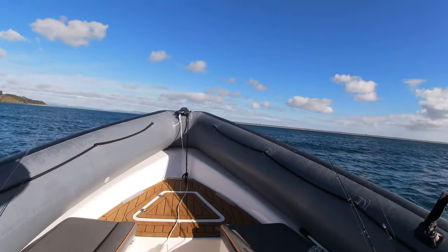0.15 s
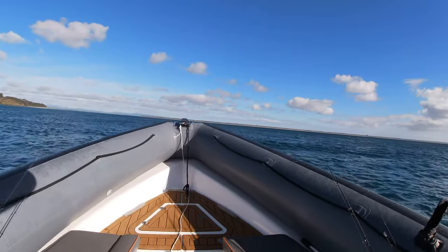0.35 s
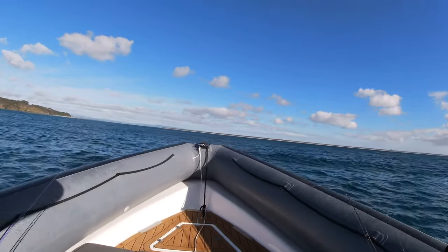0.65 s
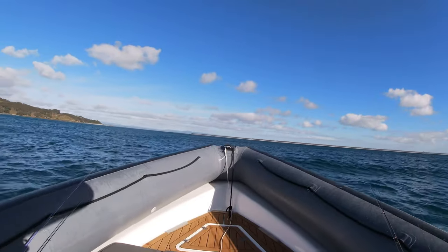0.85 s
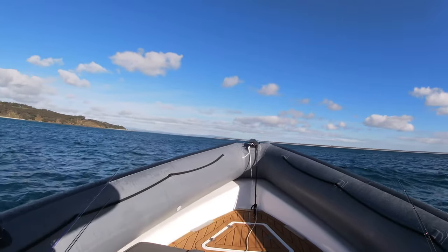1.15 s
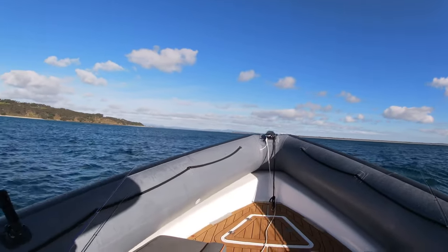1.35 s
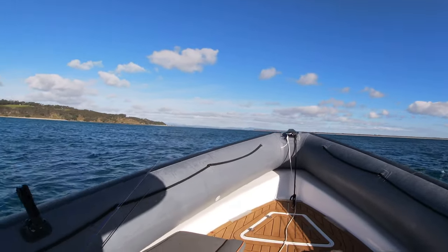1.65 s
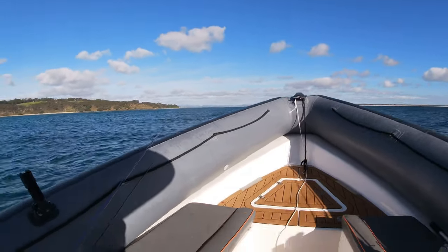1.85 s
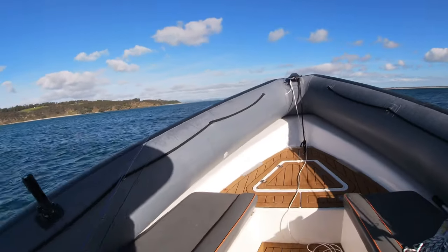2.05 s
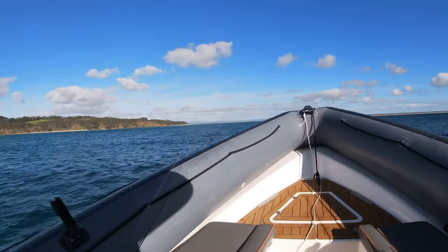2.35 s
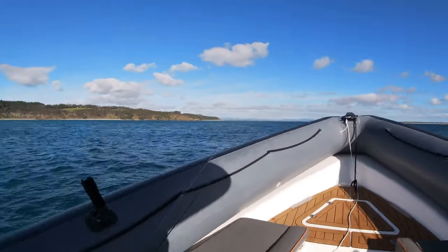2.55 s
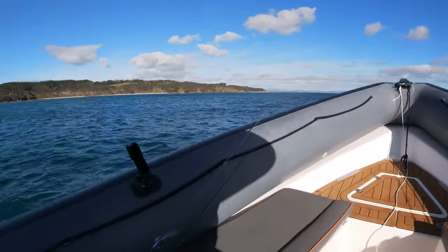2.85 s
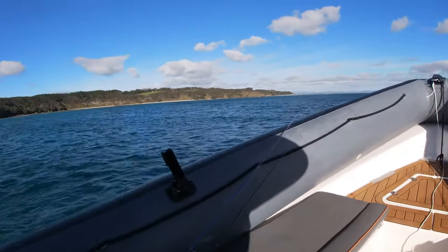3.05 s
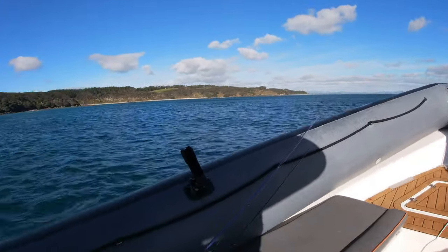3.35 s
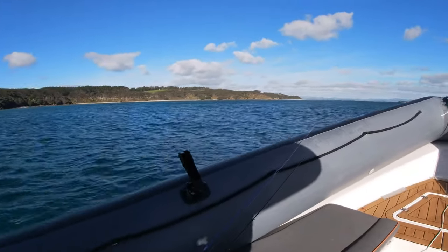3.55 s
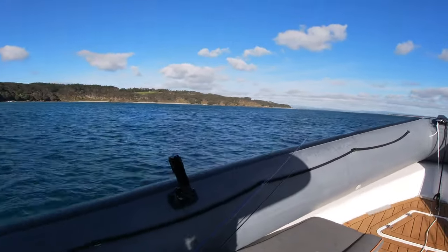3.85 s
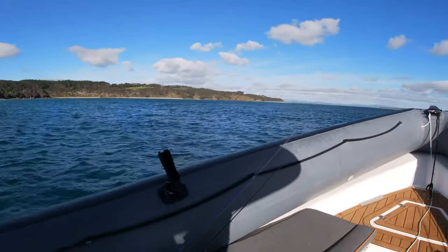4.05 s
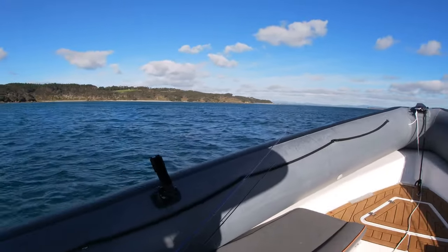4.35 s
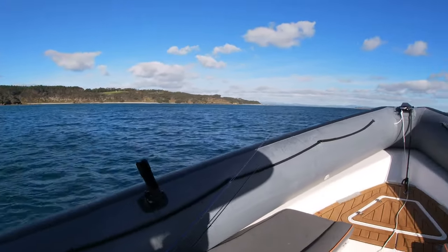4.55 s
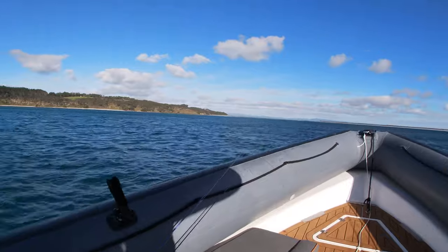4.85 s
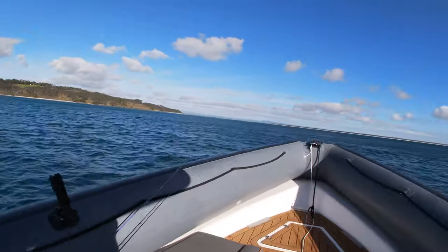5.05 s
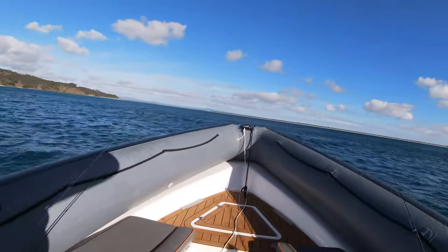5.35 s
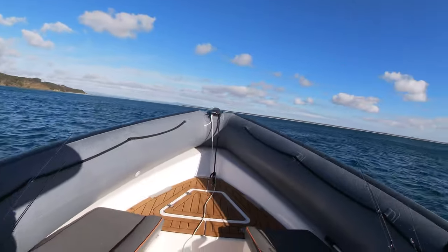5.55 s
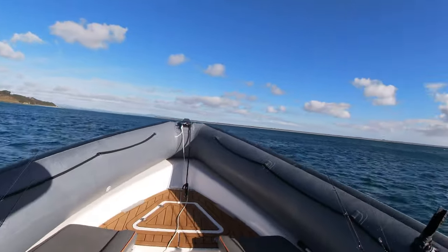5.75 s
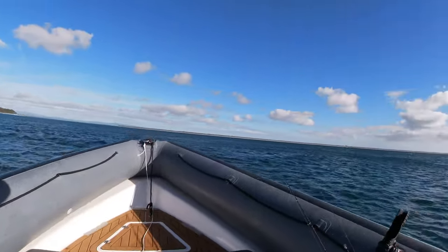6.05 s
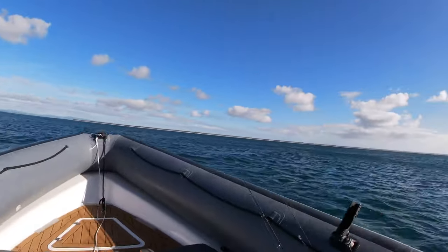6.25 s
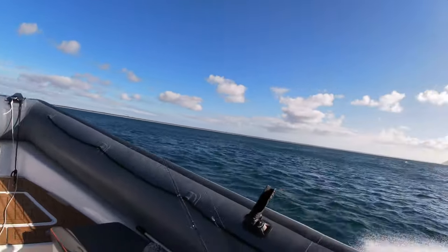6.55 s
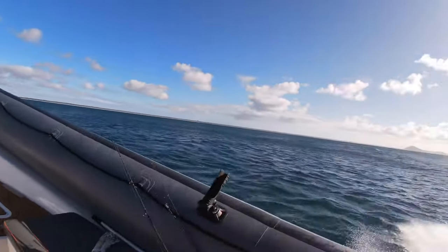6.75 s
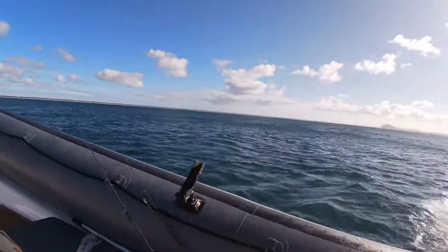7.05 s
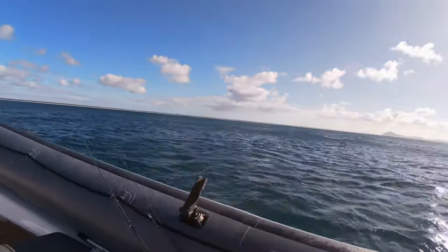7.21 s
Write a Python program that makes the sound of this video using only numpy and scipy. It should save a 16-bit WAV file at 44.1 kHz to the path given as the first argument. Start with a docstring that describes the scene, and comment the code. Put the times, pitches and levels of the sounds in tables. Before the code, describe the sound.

Harsh wind gusts thump, tear and crackle on a small microphone aboard a fast inflatable boat, over rushing water, spray hiss and outboard drone.

```python
"""An inflatable speedboat runs over choppy sea, heard through a small microphone port in the airstream.
Two beating sines drone and a gear whine sings, loud at first; they sink before 1 s and return higher after 5 s.
Throughout, shaped noise makes hull water, bow foam, deep airflow rumble, and a hiss each time the bow drops.
Lesser random gusts run throughout; from 0.3 s larger ones thump, tear and crackle; spikes crack from 0.5 s.
Bright noise bursts come from 3.6 s; pitched noise bands swish near 5.0, 6.4 and 7.2 s."""
import sys
import numpy as np
from scipy import signal
from scipy.fft import rfft, irfft
from scipy.io import wavfile
from scipy.ndimage import uniform_filter1d

SR = 44100
rng = np.random.default_rng(int(sys.argv[2]) if len(sys.argv) > 2 else 0)


def materialize(psi):
    """Save the field psi as 16-bit PCM at rate SR to the path in sys.argv[1].

    A 1-D psi becomes a single channel; in a 2-D psi each row is a channel.
    """
    bounded = np.clip(np.atleast_2d(psi).T, -1, 1)
    quanta = np.round(bounded * 32767).astype(np.int16)
    wavfile.write(sys.argv[1], SR, quanta)


N = 325458
TIME = np.arange(N) / SR
# Spectra are relative; each sound is scaled after filtering. Level tables are before any *_gain_db.


def from_db(db):
    """Decibels to amplitude gain."""
    return 10 ** (np.asarray(db) / 20)


def rms_one(x):
    """Scale to unit power."""
    return x / np.sqrt(np.mean(x ** 2) + 1e-20)


def in_time(rows):
    """Interpolate each table column over TIME; the first column is time."""
    s, *columns = np.transpose(rows)
    return [np.interp(TIME, s, column) for column in columns]


def swells(rows):
    """Sum of Gaussian bells in dB, one per row."""
    coarse_s = TIME[::40]
    total_db = sum(level_db * np.exp(-((coarse_s - middle_s) / half_width_s) ** 2)
                   for middle_s, half_width_s, level_db in rows)
    return np.interp(TIME, coarse_s, total_db)


def noise():
    """White noise."""
    return rng.standard_normal(N)


def drift(rate_hz):
    """Unit-power random curve, low-passed near rate_hz."""
    hz = np.arange(N // 2 + 1) * SR / N
    return rms_one(irfft(rfft(noise()) / (1 + (hz / rate_hz) ** 4), N))


def flutter(rate_hz, depth_db):
    """Unit-power random gain, extremes rounded by tanh."""
    return rms_one(from_db(depth_db * 2 * np.tanh(drift(rate_hz) / 2)))


def filtered(x, spectrum):
    """Shape the spectrum with a gain that leaves the power of white noise unchanged."""
    spectrum_hz, spectrum_db = np.transpose(spectrum)
    bins_hz = np.arange(1, N // 2 + 2) * SR / N
    gain_db = np.interp(np.log(bins_hz), np.log(spectrum_hz), spectrum_db)
    return irfft(rfft(x) * rms_one(from_db(gain_db)), N)


def colour(x, spectrum):
    """Shape the spectrum; unit power."""
    return rms_one(filtered(x, spectrum))


def even(x, span_s):
    """Level the power over spans longer than span_s."""
    size = max(int(span_s * SR), 8)
    power = uniform_filter1d(uniform_filter1d(x ** 2, size), size)
    return x / np.sqrt(power + 1e-9)


def tone(hz):
    """Unit-power sine that follows a pitch curve."""
    return np.sqrt(2) * np.sin(2 * np.pi * np.cumsum(hz) / SR)


# short level dips: middle_s, half_width_s, depth_db (negative = rise)
DIPS = [(0.08, 0.045, 5.5), (0.281, 0.028, 3.5), (0.64, 0.017, 1), (1.025, 0.03, 3), (1.21, 0.048, 6),
        (1.357, 0.014, 5), (1.415, 0.011, 9), (1.49, 0.027, 4.5), (1.66, 0.019, 11), (1.992, 0.015, 9),
        (2.155, .018, 5.5), (2.32, 0.011, 19), (2.661, 0.01, 9), (2.733, .014, -2.5), (3.055, 0.062, 4),
        (3.262, 0.019, 2), (3.419, 0.015, 13), (3.492, 0.014, 6), (3.643, 0.032, 6), (4.026, 0.0089, 7),
        (4.122, 0.025, -0.5), (4.232, 0.02, 5), (4.391, 0.025, 8.5), (4.637, 0.016, 13),
        (4.896, 0.0075, 10), (5.114, .016, 2.5), (5.215, 0.02, 3), (5.668, .014, 4), (5.723, 0.019, 3.5),
        (7.145, 0.019, 4.5), (7.238, 0.008, 10), (7.317, 0.0091, 16)]


def dip_gain():
    """Amplitude gain that dips briefly, often beside loud hits."""
    return from_db(-swells(DIPS))


# outboards: time_s, whine_hz, whine_db, drone_db
ENGINE = [(0, 427, -37.5, -18.5), (.4, 433, -33.5, -17), (.7, 435, -31.5, -21.5), (.95, 422, -37, -36.5),
          (3.3, 416, -50.5, -35.5), (5.2, 470, -44, -35), (5.65, 480, -37.5, -26), (6.2, 481, -38, -26),
          (6.85, 479, -40, -28.5), (7.38, 470, -44, -28)]
WHINE_PER_DRONE = 3.7   # gear whine pitch / exhaust pitch


def outboards(drone_waver_hz, twin_hz_above, twin_db):
    """Two close exhaust sines beat into a throb; a thin gear whine follows the same engine speed."""
    whine_hz, whine_db, drone_db = in_time(ENGINE)
    drone_hz = whine_hz / WHINE_PER_DRONE
    first = tone(drone_hz + drone_waver_hz * drift(20))
    twin = tone(drone_hz + twin_hz_above + drone_waver_hz * drift(20)) * from_db(twin_db)
    drone = (first + twin) * flutter(rate_hz=30, depth_db=1.4)
    whine = tone(whine_hz + 4.5 * drift(25)) * flutter(rate_hz=22, depth_db=2.8)   # 4.5 Hz waver
    return drone * from_db(drone_db) + whine * from_db(whine_db)


# water along the hull: time_s, level_db
RUSH = [(0.0, -49), (0.45, -38), (1.27, -42.5), (1.91, -37), (4.8, -39), (5.9, -40.5), (6.45, -36),
        (6.8, -44), (7.38, -39.5)]
# water spectrum: freq_hz, density_db_per_hz
WATER = [(150, -5), (400, 9.5), (600, 1.5), (900, 0.5), (1350, -2.5), (2000, -12.5), (3000, -19.5),
         (4300, -38), (6000, -39.5), (9000, -59)]


def hull_water(gain_db):
    """Turbulent water rushing along the hull: fluttering noise."""
    level_db, = in_time(RUSH)
    return colour(noise(), WATER) * flutter(rate_hz=49, depth_db=1.0) * from_db(level_db + gain_db)


# foam beside the tube: time_s, level_db
BOW_WAVE = [(0.0, -50.5), (0.78, -51), (1.35, -54), (1.62, -60), (1.79, -44.5), (1.93, -46.5), (2.63, -52),
            (3.33, -54.5), (3.95, -50.5), (4.27, -54.5), (4.77, -53.5), (5.55, -45.5), (5.75, -51),
            (6.04, -50.5), (6.47, -43), (6.68, -46.5), (7.38, -50)]
# foam spectrum: freq_hz, density_db_per_hz
FOAM = [(1000, -16), (2000, 1), (2900, 1), (4200, -4), (5200, -12), (7000, -39.5)]


def bow_foam(gain_db):
    """Bow-wave foam: finely grained noise under a slower flutter."""
    level_db, = in_time(BOW_WAVE)
    grains = colour(noise() * flutter(rate_hz=430, depth_db=2.0), FOAM)
    return grains * flutter(rate_hz=35, depth_db=0.8) * from_db(level_db + gain_db)


# spray sheets, one per bow drop: start_s, hold_s, level_db
SPRAY = [(0.0, 0.025, -56.5), (0.896, 0.23, -59.5), (1.85, 0.049, -54.5), (2.069, 0.11, -51),
         (2.817, 0.14, -56.5), (3.596, 0.34, -61.5), (4.14, .05, -57), (4.892, 0.053, -63.5),
         (5.479, 0.19, -49), (6.49, 0.16, -53.5)]
SPRAY_RISE_DB_PER_S, SPRAY_FALL_DB_PER_S, MIST_DB = 57.5, 43, -68.5


def spray_strength():
    """Each sheet swells up to its start, holds and rains out; powers add over a constant mist."""
    power = from_db(MIST_DB) ** 2
    for start_s, hold_s, level_db in SPRAY:
        t = TIME - start_s
        rise_db = SPRAY_RISE_DB_PER_S * np.maximum(-t, 0)
        fall_db = SPRAY_FALL_DB_PER_S * np.maximum(t - hold_s, 0)
        power = power + from_db(level_db - rise_db - fall_db) ** 2
    return np.sqrt(power)


# hiss spectrum: freq_hz, density_db_per_hz
HISS = [(900, -4), (2000, 3.5), (3200, 1.5), (4600, 4), (5400, 7.5), (5950, 4.5), (6500, -4.5), (7100, -8),
        (8500, -13.5), (10300, -26.5), (11200, -35), (13000, -42.5)]
# bright hiss spectrum: freq_hz, density_db_per_hz
BRIGHT_HISS = [(3000, -24.5), (5000, -2), (5900, 7.5), (6700, -4), (8500, -10), (10300, -15), (11200, -21),
               (13000, -34.5)]


def spray(hiss_gain_db, bright_gain_db, bright_growth):
    """Spray hiss with a brighter top layer, stronger where the hiss is louder."""
    sheets = spray_strength()
    hiss = colour(noise() * flutter(rate_hz=600, depth_db=1.5), HISS) * from_db(hiss_gain_db)
    bright = colour(noise() * flutter(rate_hz=1300, depth_db=4.5), BRIGHT_HISS)
    bright = bright * (sheets / sheets.max()) ** bright_growth * from_db(bright_gain_db)
    return (hiss + bright) * sheets * flutter(rate_hz=25, depth_db=0.6)


# steady airflow, also sets the puffs: time_s, level_db
FLOW = [(0.0, -30), (0.659, -27), (1.17, -27), (2.36, -27), (2.769, -31), (3.021, -23), (4.4, -27),
        (4.851, -22.5), (5.71, -29.5), (6.56, -25.5), (6.66, -26), (6.93, -28.5), (7.09, -22), (7.38, -28)]
# slow eddies heaving at the port: middle_s, half_width_s, boost_db
BUFFETS = [(0.785, 0.036, 4.5), (0.84, 0.012, 3), (0.87, 0.018, 4.5), (0.917, 0.0098, 4.5),
           (0.98, .014, 2.5), (1.09, 0.02, 6), (1.389, 0.018, 9), (1.578, 0.01, 10.5), (1.882, 0.014, 4),
           (2.298, .014, 5), (2.364, 0.013, 3), (2.63, 0.019, 5), (2.815, 0.025, 7.5), (3.465, 0.014, 7),
           (3.814, 0.038, 2.5), (4.078, 0.013, 5.5), (4.192, 0.011, 4), (4.428, 0.017, 4), (4.821, .018, 3),
           (5.148, 0.015, 6.5), (5.484, 0.013, 4), (6.078, 0.015, 9), (6.19, 0.029, 4), (7.222, .01, 5)]
# rumble spectrum: freq_hz, density_db_per_hz
RUMBLE = [(8, -12.5), (20, 0), (35, 1), (60, 2.5), (85, -1.5), (115, -1.5), (150, -12), (250, -35.5),
          (600, -95)]
# small-eddy spectrum: freq_hz, density_db_per_hz
AIRFLOW = [(60, -18), (130, 1.5), (200, 2), (300, -5.5), (420, -5), (600, -17), (1200, -40), (4000, -85)]
# tearing spectrum, rustle and gusts: freq_hz, density_db_per_hz
TEAR = [(150, -11.5), (350, -9), (520, 6.5), (750, 2.5), (1100, -3.5), (1500, -9.5), (2100, -25),
        (3000, -35.5), (5000, -56), (9000, -88.5)]
RUMBLE_DB, RUMBLE_FOLLOWS = -17.5, 0.41   # at mean airflow; share of the airflow's dB swing


def airstream(airflow_gain_db, rustle_db, dip, flow_follows):
    """Large eddies rumble and lurch with buffets, small ones flow and rustle; all follow the dips."""
    airflow_db, = in_time(FLOW)
    rumble_db = RUMBLE_DB + RUMBLE_FOLLOWS * (airflow_db - airflow_db.mean()) + swells(BUFFETS)
    eddies = flutter(rate_hz=42, depth_db=2.5)
    lumps = rms_one(eddies ** 0.39) * flutter(rate_hz=14, depth_db=1.5)
    rumble = even(colour(noise(), RUMBLE), 0.031) * lumps * from_db(rumble_db)
    flow = even(colour(noise(), AIRFLOW), 0.02) * eddies * from_db(airflow_gain_db)
    rustle = colour(noise(), TEAR) * rms_one(eddies ** 2) * from_db(rustle_db)
    small_eddies = (flow * dip ** flow_follows + rustle * dip) * from_db(airflow_db)
    return rumble * dip + small_eddies


# short bright noise bursts on hard wind hits: middle_s, decay_s, level_db
BRIGHT_BURSTS = [(3.565, 0.0087, -42), (4.003, 0.0056, -45.5), (6.384, 0.0053, -44), (6.487, 0.0053, -34)]
# burst spectrum: freq_hz, density_db_per_hz
BURST = [(1500, -19), (3000, 5), (4200, -0.5), (5800, -5), (7000, -21), (10000, -36), (13000, -56)]


def bright_bursts(gain_db):
    """Bright bursts of noise, rising and decaying exponentially."""
    strength = sum(from_db(level_db) * np.exp(-np.minimum(np.abs(TIME - middle_s) / decay_s, 20))
                   for middle_s, decay_s, level_db in BRIGHT_BURSTS)
    bright = even(colour(noise() * flutter(rate_hz=900, depth_db=0.5), BURST), 0.004)
    return bright * strength * from_db(gain_db)


# swishes at the housing edge: start_s, length_s, first_hz, last_hz, width_per_pitch, peak_db
SWISHES = [(5.034, .024, 894, 730, 0.191, -22.5), (6.346, 0.033, 458, 750, 0.1, -24),
           (6.375, 0.052, 485, 366, 0.057, -24), (6.366, 0.11, 1280, 947, .08, -39),
           (6.442, 0.047, 484, 690, 0.18, -27), (6.45, .1, 2010, 1664, .12, -41),
           (6.476, 0.13, 556, 289, 0.045, -38), (6.496, 0.039, 1140, 1260, 0.082, -39),
           (6.572, .048, 634, 397, 0.124, -26), (6.607, 0.057, 806, 674, 0.2, -25),
           (7.209, 0.055, 1724, 1390, 0.26, -38)]


def swishes():
    """Eddies shed from an edge make a noise band whose pitch glides with the air speed."""
    out = np.zeros(N)
    shedding_hz = 100
    shedding = drift(shedding_hz) + 1j * drift(shedding_hz)
    for start_s, length_s, first_hz, last_hz, width_per_pitch, peak_db in SWISHES:
        near = slice(int(start_s * SR), int((start_s + length_s) * SR))
        progress = np.linspace(0, 1, len(TIME[near]))
        phase = 2 * np.pi * np.cumsum(first_hz * (last_hz / first_hz) ** progress) / SR
        read_speed = width_per_pitch * first_hz / shedding_hz   # faster reading widens the band
        wobble = np.interp(start_s / 2 + progress * length_s * read_speed, TIME, shedding)
        band = rms_one((wobble * np.exp(1j * phase)).real)
        arch = 2 * np.sqrt(progress * (1 - progress))
        out[near] += band * arch * from_db(peak_db)
    return out


# cracks where flow breaks off the port: start_s, tail_s, level_db
CRACKS = [(0.468, 0.0039, -25.5), (0.584, 0.004, -27), (0.974, 0.0055, -24), (1.571, 0.0018, -24),
          (1.602, 0.0062, -21), (1.6185, 0.0028, -22.5), (1.6945, 0.0055, -24), (1.866, .008, -22.5),
          (2.05, .002, -23), (2.439, 0.0043, -17), (2.478, 0.0045, -26.5), (2.534, 0.0074, -19),
          (2.805, 0.0015, -16), (2.857, 0.0044, -21.5), (2.877, .001, -27.5), (3.091, 0.0026, -20),
          (3.452, 0.013, -16.5), (3.555, 0.017, -17.5), (3.58, .001, -17), (4.0056, 0.0019, -21.5),
          (4.01, 0.0044, -18.5), (4.047, 0.0018, -13.5), (4.073, 0.0016, -10), (4.334, 0.0024, -20.5),
          (4.708, 0.0033, -21.5), (4.855, 0.0026, -19.5), (4.906, 0.0024, -25.5), (5.033, 0.0023, -18),
          (5.415, 0.0051, -22), (5.5904, 0.0028, -30), (6.381, .005, -19.5), (6.393, 0.0024, -18.5),
          (6.47, 0.0038, -23), (6.4825, 0.0052, -18), (6.619, .003, -22.5), (6.6263, .004, -22),
          (6.984, .003, -24.5), (7.086, 0.0028, -27), (7.174, 0.023, -13.5), (7.207, 0.0034, -16.5),
          (7.275, 0.003, -22.5), (7.299, 0.0039, -27.5), (7.361, 0.0018, -14.5)]
# crack spectrum: freq_hz, density_db_per_hz
SNAP = [(100, 8.5), (400, 4), (900, 7), (1600, 1), (3000, -12), (4300, -23), (6000, -30), (7200, -48),
        (10000, -70.5)]


def cracks(spike_s, gain_db):
    """Each crack is a pressure spike with the energy of spike_s of noise, plus a short ragged tail."""
    spikes, tails = np.zeros(N), np.zeros(N)
    for start_s, tail_s, level_db in CRACKS:
        first = int(start_s * SR)
        t = TIME[:N - first][:SR // 10]
        spikes[first] = from_db(level_db) * np.sqrt(spike_s * SR)
        tails[first:first + len(t)] += from_db(level_db) * np.exp(-(t / tail_s) ** 2)
    ragged = even(colour(noise() * flutter(rate_hz=2700, depth_db=7.0), SNAP), 0.0068)
    tail = ragged * uniform_filter1d(tails, size=32)
    return (filtered(spikes, SNAP) + tail) * from_db(gain_db)


PUFFS_PER_S, PUFF_S = 13, 0.005   # PUFF_S: middle length, varied from half to double
PUFF_THUMP_DB, PUFF_TEAR_DB, PUFF_SPREAD_DB = -1, -8, 4.5   # relative to the airflow


def puffs():
    """Random lesser gusts that follow the airflow level; rows as in GUSTS."""
    flow_s, flow_db = np.transpose(FLOW)
    rows = []
    for k, (when, size, force) in enumerate(rng.uniform(-1, 1, (120, 3))):
        start_s = (k + .5 + when / 2) / PUFFS_PER_S
        level_db = np.interp(start_s, flow_s, flow_db) + PUFF_SPREAD_DB * force
        rows.append((start_s, PUFF_S * 2 ** size, level_db + PUFF_THUMP_DB, level_db + PUFF_TEAR_DB))
    return [row for row in rows if row[0] < TIME[-1]]


# gusts hitting the port: start_s, length_s, thump_db, tear_db
GUSTS = [(0.326, 0.037, -23, -34), (0.464, 0.01, -12.5, -26.5), (0.497, .008, -22, -29),
         (0.548, 0.013, -15, -26.5), (0.583, 0.0098, -17, -28.5), (0.83, 0.021, -18, -28.5),
         (0.857, 0.0065, -17, -28), (0.907, 0.014, -12, -26), (0.969, 0.022, -13.5, -23),
         (1.079, 0.0066, -13, -25), (1.095, 0.025, -19.5, -22.5), (1.3, 0.03, -22.5, -33),
         (1.372, 0.017, -35, -23), (1.437, 0.016, -17.5, -27), (1.535, 0.014, -18.5, -26.5),
         (1.559, 0.016, -10, -30.5), (1.689, 0.011, -23, -23), (1.714, 0.0063, -12.5, -25.5),
         (1.77, 0.021, -24, -25), (1.816, 0.023, -32, -25.5), (1.839, 0.051, -18, -23.5),
         (1.935, 0.011, -21.5, -28), (1.968, 0.0096, -31, -26.5), (2.027, .008, -27, -26.5),
         (2.041, 0.011, -17, -26), (2.077, 0.031, -14.5, -23.5), (2.191, 0.013, -18, -27.5),
         (2.291, 0.01, -18, -40), (2.334, 0.035, -17.5, -45), (2.437, 0.03, -19, -24),
         (2.472, 0.019, -20, -21.5), (2.504, 0.046, -16.5, -25.5), (2.598, 0.018, -14.5, -26),
         (2.631, 0.0093, -20.5, -29), (2.795, 0.013, -14, -25), (2.821, 0.02, -19, -26),
         (2.848, 0.022, -12.5, -25.5), (2.912, 0.03, -16.5, -37), (3.009, 0.01, -27, -23.5),
         (3.083, 0.01, -13.5, -28), (3.152, 0.013, -36, -24), (3.193, 0.014, -15.5, -23),
         (3.369, 0.027, -16, -26.5), (3.438, 0.033, -13, -37), (3.49, 0.034, -32, -28),
         (3.537, 0.055, -15.5, -21.5), (3.728, 0.011, -26, -43), (3.768, .016, -24, -31),
         (3.813, 0.013, -23, -30.5), (3.914, 0.024, -15, -29.5), (3.957, 0.054, -14, -32.5),
         (4.04, 0.018, -12.5, -21.5), (4.059, 0.023, -8.5, -24.5), (4.181, 0.011, -26, -30),
         (4.288, 0.012, -22.5, -26), (4.312, 0.033, -14.5, -24.5), (4.433, 0.0094, -9, -24.5),
         (4.457, 0.01, -12, -24.5), (4.468, 0.054, -16, -23.5), (4.534, 0.048, -16.5, -24.5),
         (4.667, 0.0059, -13, -31), (4.702, 0.017, -10.5, -24.5), (4.761, 0.011, -23, -30),
         (4.856, 0.019, -15, -25), (4.91, 0.0071, -15, -25.5), (4.924, 0.023, -27, -25),
         (5.006, 0.0064, -12.5, -24), (5.021, 0.03, -13, -23), (5.315, 0.014, -12, -30),
         (5.393, 0.026, -17.5, -23.5), (5.433, .01, -20, -30), (5.58, 0.016, -14, -24),
         (5.603, 0.03, -13, -27), (5.897, 0.039, -18.5, -34), (5.965, 0.012, -23, -30.5),
         (6.089, 0.015, -16.5, -24), (6.307, .018, -19.5, -33), (6.359, 0.062, -15, -29.5),
         (6.455, 0.101, -14.5, -27.5), (6.571, 0.033, -17.5, -27.5), (6.615, 0.023, -11.5, -26.5),
         (6.853, 0.014, -20.5, -37), (6.93, 0.012, -16.5, -27), (6.956, .006, -15, -27),
         (6.976, 0.019, -10, -24.5), (7.004, 0.011, -17, -24.5), (7.018, 0.044, -13, -21.5),
         (7.077, 0.012, -17.5, -23), (7.098, 0.018, -27, -26.5), (7.166, 0.049, -14.5, -21),
         (7.264, 0.018, -12, -22), (7.287, 0.017, -14, -25), (7.348, 0.035, -15, -25.5)]
CATCH_S, LET_GO_S = 0.0007, 0.0042   # time constants of the tearing


def gust_strength():
    """Thump and tear envelopes: exponential catch, hold, exponential release; the loudest gust wins."""
    thump, tear = np.zeros(N), np.zeros(N)
    for start_s, length_s, thump_db, tear_db in GUSTS + puffs():
        near = slice(max(int((start_s - .05) * SR), 0), int((start_s + length_s + .1) * SR))
        t = TIME[near] - start_s
        shape = np.exp(np.minimum(t, 0) / CATCH_S - np.maximum(t - length_s, 0) / LET_GO_S)
        thump[near] = np.maximum(thump[near], from_db(thump_db) * np.sqrt(shape))   # large eddies linger
        tear[near] = np.maximum(tear[near], from_db(tear_db) * shape)
    return thump, tear


# thump spectrum: freq_hz, density_db_per_hz
THUMP = [(30, -0.5), (80, -3), (150, 6), (250, -0.5), (400, -5), (600, -30.5), (1200, -46), (4000, -93)]
# crackle spectrum: freq_hz, density_db_per_hz
CRACKLE = [(800, -2), (1800, 12), (2600, 4), (3500, -2), (4500, -9), (6000, -19), (7200, -36), (10000, -49),
           (13000, -61.5)]


def gusts(thump_gain_db, tear_gain_db, crackle_gain_db, crackle_growth, hard_gust_db, trough_share):
    """Clustered pressure kicks thump and tear at their crests; harder gusts crackle more."""
    thump, tear = gust_strength()
    kicks = noise() * flutter(rate_hz=232, depth_db=3.5) * flutter(rate_hz=46, depth_db=0.5)
    pressure = even(colour(kicks, THUMP), 0.017)
    crests = even(trough_share + np.abs(pressure), 0.0069)
    low = pressure * thump * from_db(thump_gain_db)
    mid = even(colour(kicks * crests, TEAR), 0.015) * tear * from_db(tear_gain_db)
    fine = even(colour(noise() * crests * flutter(rate_hz=450, depth_db=2.0), CRACKLE), 0.0088)
    hardness = (tear / from_db(hard_gust_db)) ** crackle_growth
    high = fine * tear * hardness * from_db(crackle_gain_db)
    return low + mid + high


def scene():
    """Engines and sea under the wind on the port; engines, hull water, foam and airstream share the dips."""
    dip = dip_gain()
    boat = outboards(drone_waver_hz=8.22, twin_hz_above=16, twin_db=-7) * dip
    boat = boat + (hull_water(gain_db=2.0) + bow_foam(gain_db=-5.5)) * dip ** 0.37
    boat = boat + spray(hiss_gain_db=0.7, bright_gain_db=-9.5, bright_growth=0.5)
    wind = airstream(airflow_gain_db=0.05, rustle_db=-15.0, dip=dip, flow_follows=0.59)
    wind = wind + bright_bursts(gain_db=2.5)
    wind = wind + swishes() + cracks(spike_s=0.0011, gain_db=-2.5)
    wind = wind + gusts(thump_gain_db=-1.5, tear_gain_db=-1.74, crackle_gain_db=-10.5,
                        crackle_growth=0.59, hard_gust_db=-13.0, trough_share=0.82)
    return (boat + wind)[None]


def limiter(x, threshold_db, release_db_per_s):
    """Peaks above threshold duck the level, smoothed over 3 ms; it recovers at a constant dB rate."""
    over_db = np.maximum(20 * np.log10(np.abs(x) + 1e-9) - threshold_db, 0)
    release_db = release_db_per_s * TIME
    held_db = np.maximum.accumulate(over_db + release_db, axis=-1) - release_db
    smoothing = np.exp(-1 / (.003 * SR))
    return x * from_db(-signal.lfilter([1 - smoothing], [1, -smoothing], held_db))


CUTOFF_HZ = 12700   # stopband edge


def record(dry):
    """Limit, round off the peaks, fade the ends over 3 ms and cut the top."""
    ceiling = 0.95
    limited = limiter(dry, threshold_db=-4.0, release_db_per_s=88.5)
    rounded = limited / (1 + (limited / ceiling) ** 4) ** (1 / 4)
    fade = np.clip(np.minimum(TIME, TIME[-1] - TIME) / .003, 0, 1)
    top_cut = signal.cheby2(12, 70, CUTOFF_HZ, fs=SR, output="sos")
    return signal.sosfilt(top_cut, rounded * fade)


dry = scene()
out = record(dry)
materialize(out)
```